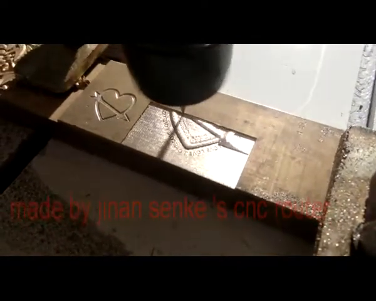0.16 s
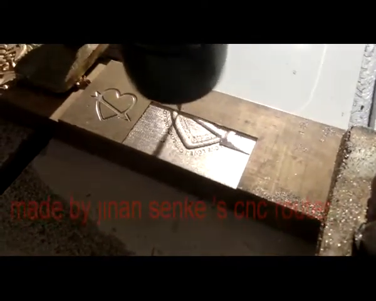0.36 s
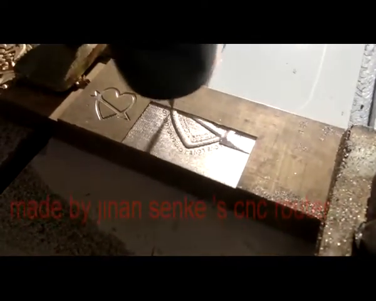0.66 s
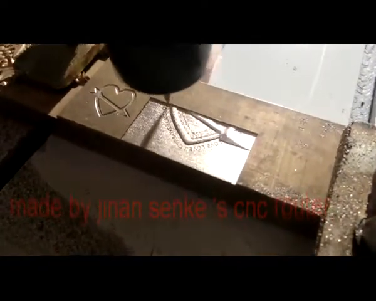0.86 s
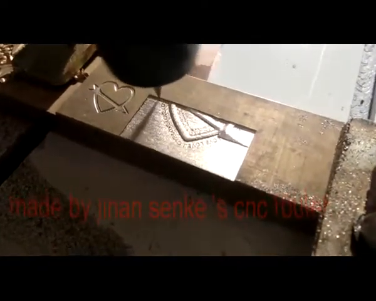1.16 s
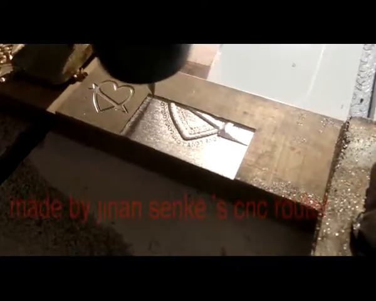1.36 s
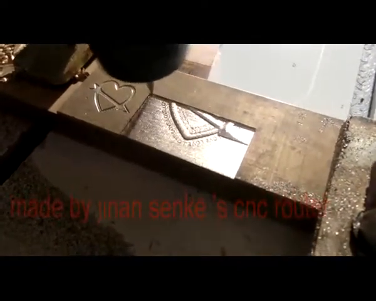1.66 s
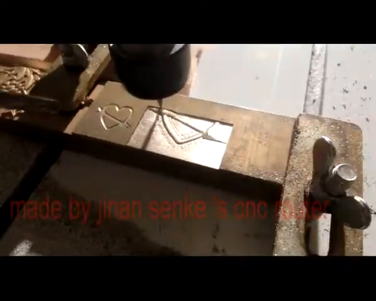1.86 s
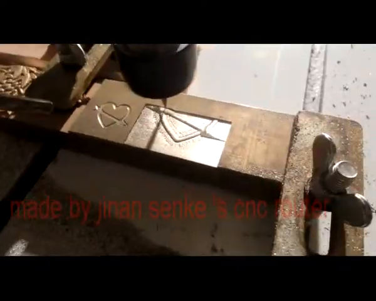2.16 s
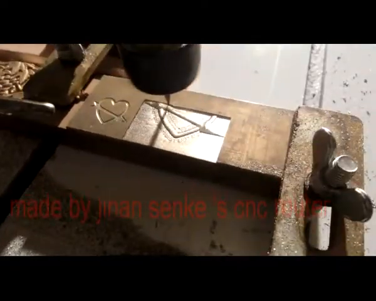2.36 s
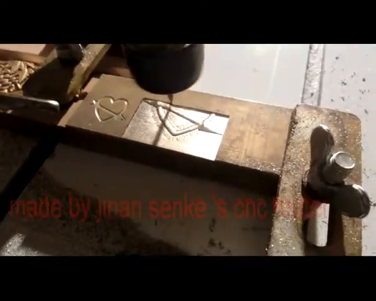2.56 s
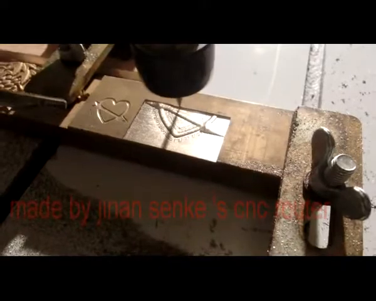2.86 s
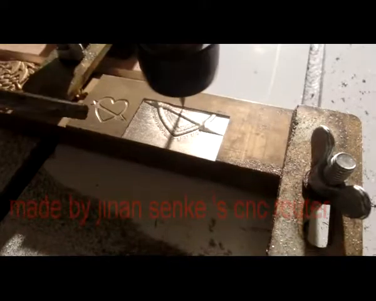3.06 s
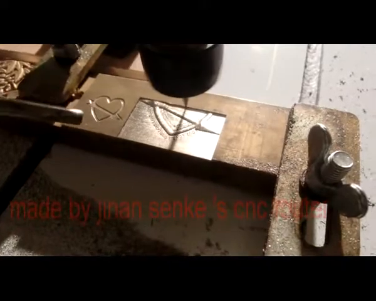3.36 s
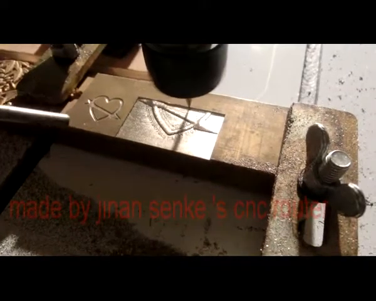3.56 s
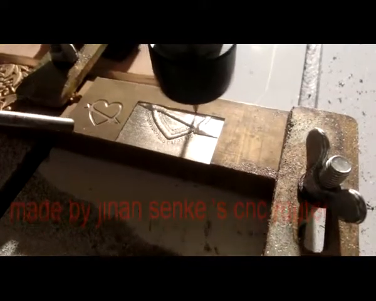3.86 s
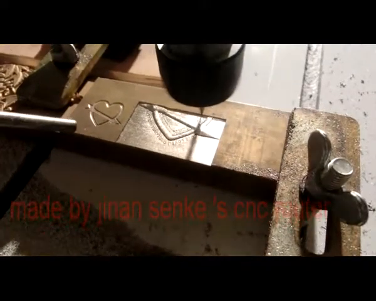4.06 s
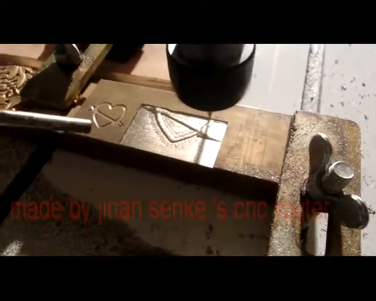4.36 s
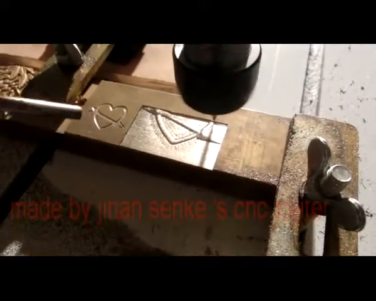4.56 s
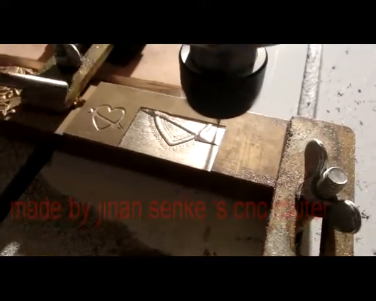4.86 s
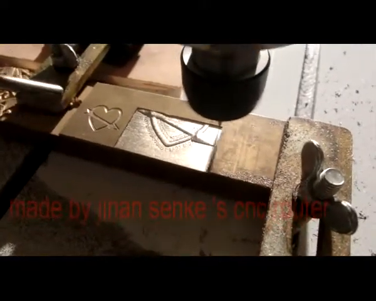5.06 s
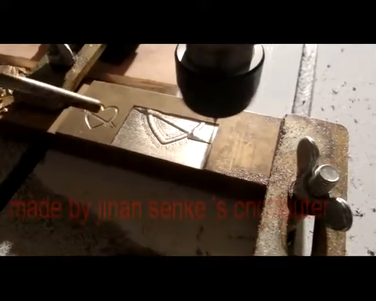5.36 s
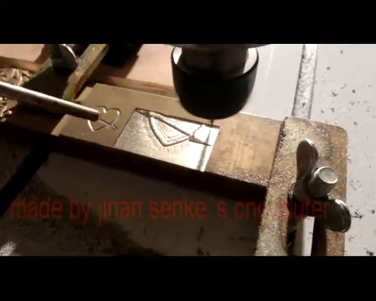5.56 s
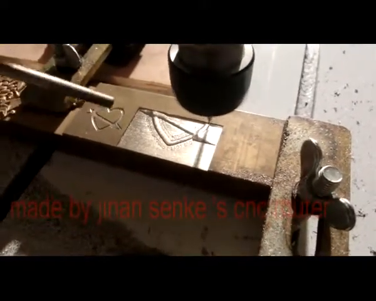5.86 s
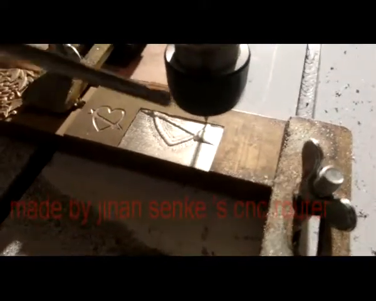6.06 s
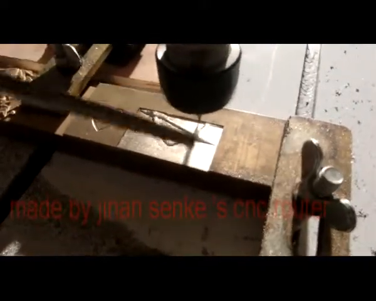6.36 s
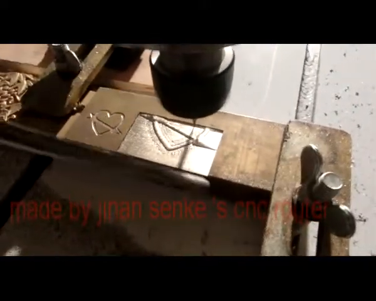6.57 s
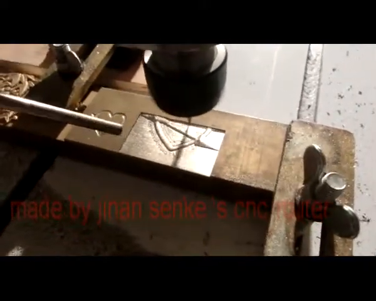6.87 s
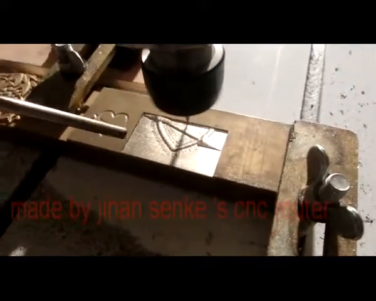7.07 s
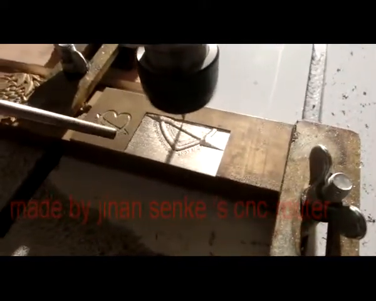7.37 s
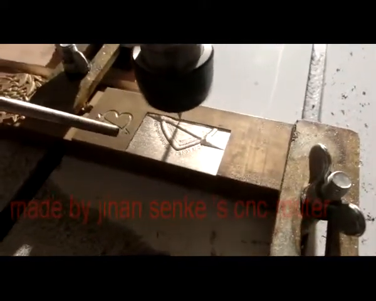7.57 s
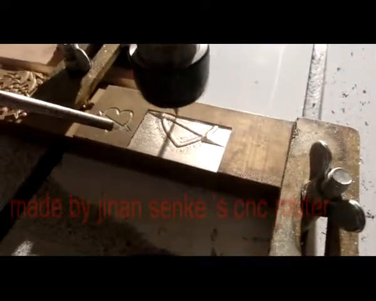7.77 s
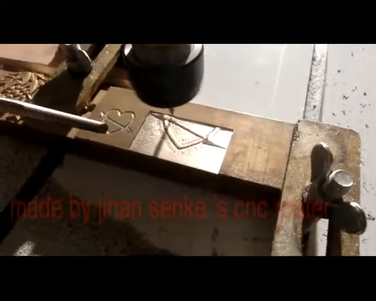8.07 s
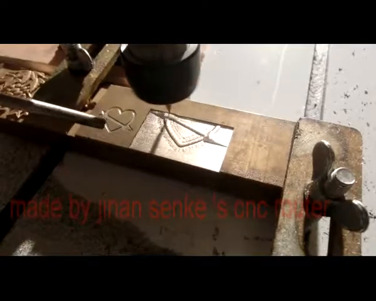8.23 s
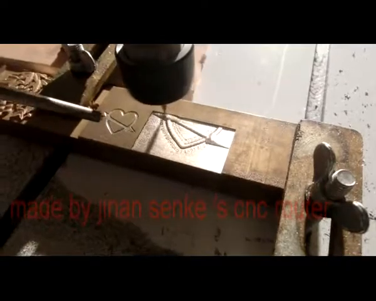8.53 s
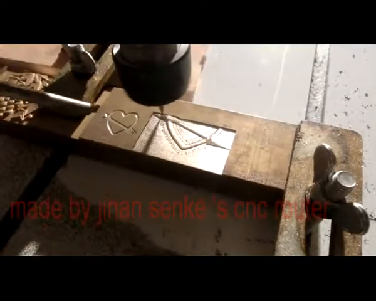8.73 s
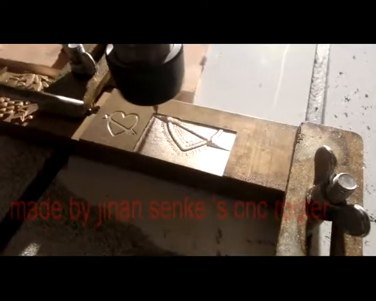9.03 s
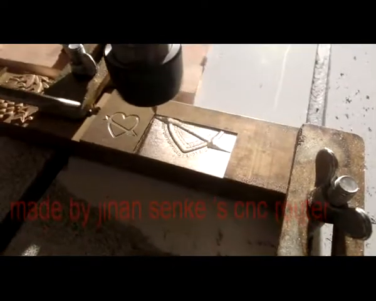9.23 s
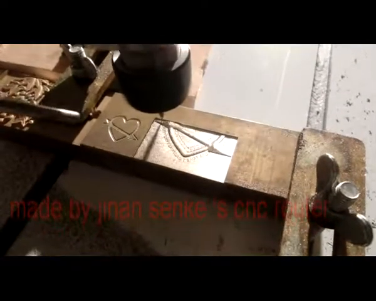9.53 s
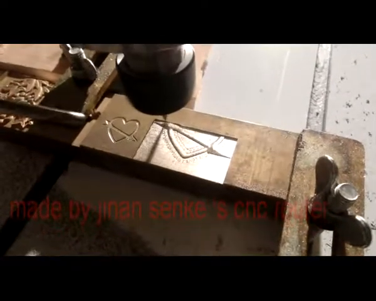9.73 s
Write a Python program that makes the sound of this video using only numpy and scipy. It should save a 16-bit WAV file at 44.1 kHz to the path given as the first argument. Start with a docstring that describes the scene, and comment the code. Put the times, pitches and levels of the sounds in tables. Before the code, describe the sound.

A small router spindle whines at a steady pitch as its bit scrapes and rings against a metal plate. An air gun gives two short, hollow puffs, and all sound cuts out for an instant. It returns with a long hissing blast of air that swells and shifts in tone over the now quieter whine. Feed motors drone faintly underneath, and a single small microphone picks up the machine.

```python
"""A small router spindle whines at a steady speed over a metal plate: harmonics of its shaft rotation and
switching tones of its drive. An air gun blows the chips away with turbulent jet noise: two short puffs, then a
long blast that swings over the plate and the clamps. Beneath them the cutter rushes, scrapes and rings, and the
feed motors drone through the modes of the table. One small microphone hears it all; the sound breaks off once,
just before the long blast, and after the break the microphone hears the scene from a new place, where close
reflections colour the jet."""
import sys
import numpy as np
from scipy import signal
from scipy.io import wavfile
from scipy.ndimage import uniform_filter1d

SR = 44100
rng = np.random.default_rng(int(sys.argv[2]) if len(sys.argv) > 2 else 0)


def dump(signal):
    """Clip the signal to [-1, 1] and save it as 16-bit WAV at the path in sys.argv[1]."""
    limited = np.clip(np.atleast_2d(signal).T, -1, 1)
    pcm = np.round(limited * 32767).astype(np.int16)
    wavfile.write(sys.argv[1], SR, pcm)


N = 436590

SHAFT_HZ, BAND_LIMIT_HZ = 250.27, 7680
# the brief silence: start t/s, end t/s
SILENCE = (1.733, 1.9245)


def spindle():
    """Periodic rotation radiates harmonics (orders) of the shaft rate; drive switching adds high tones."""
    # before and after the silence: t/s, level/dB of orders 1, 2 and 7, drive whine level/dB
    tone_levels = [
        [(0.0, -25, -34.5, -41.5, -38), (0.25, -24, -32.5, -34, -38.5), (0.5, -19.5, -30, -31, -37),
         (0.73, -23.5, -31, -38, -35.5), (0.93, -20, -30.5, -31.5, -36.5), (1.03, -25.5, -34, -36, -41.5),
         (1.6, -22, -30, -33.5, -40), (1.65, -29, -34, -43, -46), (1.731, -30.5, -43, -46, -51)],
        [(1.93, -44.5, -48, -46, -54), (2.15, -38.5, -52, -46, -50), (2.3, -34, -42.5, -51, -48),
         (2.95, -36, -41.5, -52, -48), (3.4, -35, -43, -45, -47), (4.4, -35.5, -39.5, -44, -42),
         (4.72, -34, -40.5, -42.5, -44), (5.2, -34, -39.5, -45.5, -38), (5.6, -28.5, -44, -42.5, -45),
         (6.05, -31.5, -41.5, -43.5, -47), (6.3, -31, -44, -50, -47.5), (6.9, -30, -41.5, -40, -40),
         (8.2, -31, -39.5, -47.5, -43), (8.6, -36, -44.5, -59, -43), (8.95, -30.5, -40, -48.5, -44),
         (9.3, -28.5, -40, -45, -43), (9.55, -33.5, -39.5, -41, -43.5), (9.9, -38.5, -46, -47, -46)],
    ]
    # orders 3 and 4, in the same two parts: t/s, level/dB
    third_order = [
        [(0.0, -43), (0.702, -40), (0.866, -44), (0.896, -38), (1.016, -48), (1.604, -43.5), (1.73, -62)],
        [(1.93, -53.5), (2.19, -59), (2.6, -51), (3.5, -48.5), (4.7, -45.5), (5.95, -45.5), (6.5, -49.5),
         (7.5, -49.5), (8.3, -49.5), (8.81, -58.5), (9.63, -47.5), (9.9, -53)],
    ]
    fourth_order = [
        [(0.0, -50), (0.13, -54), (0.36, -38.5), (0.48, -49), (0.54, -38), (0.722, -53), (0.824, -42.5),
         (1.248, -47.5), (1.566, -44.5), (1.73, -52)],
        [(1.93, -57), (5.92, -55.5), (6.5, -54), (7.68, -63), (9.9, -55.5)],
    ]
    # orders that follow the second: order, level/dB re the second
    upper_orders = [(5, -14.5), (6, -31), (8, -19.5), (9, -28.5), (10, -26), (11, -27), (12, -24.5),
                    (13, -27.5), (14, -26), (15, -25), (16, -27), (17, -28.5), (18, -28), (19, -32.5),
                    (20, -32), (21, -36), (22, -34.5)]
    # one order jumps or dips for a moment: centre t/s, duration/s, order, change/dB
    jumps = [(0.42, 0.16, 7, 2), (0.605, 0.13, 7, -14.5), (0.896, 0.043, 7, -8), (4.48, 0.068, 1, -6),
             (4.492, .08, 2, -4), (4.72, .1, 1, 4), (5.3, 0.063, 2, 10), (5.365, 0.12, 1, 6.5),
             (5.377, 0.11, 2, -3), (5.47, 0.063, 1, -3), (8.188, 0.075, 1, 2.5), (9.34, 0.087, 1, 0.5),
             (9.444, 0.13, 1, -7.5)]
    # switching tones: f/Hz, level/dB re the strongest
    drive_tones = [(5747.8, -20), (5997.8, -21), (6247.8, -21), (6497.8, 0), (6747.6, -14), (6997.6, -7),
                   (7247.5, -16), (7499.0, -16)]
    t = np.arange(N) / SR
    first_db, second_db, seventh_db, whine_db = curves(tone_levels, t)
    turns = SHAFT_HZ * t + 0.01 * wander(25)  # the load nudges the shaft
    levels = {1: first_db + wander(8), 2: second_db + 0.69 * wander(8.7),
              3: curves(third_order, t)[0], 4: curves(fourth_order, t)[0],
              7: seventh_db + 1.7 * wander(11)}
    for centre, length, order, db in jumps:
        near = slice(*np.searchsorted(t, [centre - length / 2, centre + length / 2]))
        levels[round(order)][near] += db * (1 - (2 * (t[near] - centre) / length) ** 4)
    levels.update({order: second_db + db for order, db in upper_orders})
    hum = whine = 0
    for order, db in levels.items():
        waver_db = 1.06 * wander(30) if order < 8 else 2.5 * wander(6)
        hum += gain_of(db + waver_db) * np.cos(2 * np.pi * (order * turns + rng.random()))
    for hz, db in drive_tones:
        whine += gain_of(db + 1.2 * wander(40)) * np.cos(2 * np.pi * (hz * t + rng.random()))
    return np.sqrt(2) * (hum + gain_of(whine_db) * whine)


def air_gun():
    """Jet turbulence radiates four broad noise bands, coloured by fixed and gliding peaks and dips."""
    # fixed peaks and dips from close reflections off plate, clamps and gantry: f/Hz, level/dB
    reflections = [(1119, 2), (1291, -2), (1679, -3.5), (1981, 2), (2325, 1.5), (2454, -5), (2583, 2.5),
                   (2928, 2), (3273, 1.5), (3402, -3), (3660, 1.5), (3832, -2.5), (4048, 2), (4220, -6),
                   (4349, 3), (4608, -2.5), (4980, 3), (5211, -2.5), (5340, 2.5), (5598, -3), (5727, 2.5),
                   (5943, 2), (6158, -2.5), (6287, 2.5), (6632, -1.5), (6880, -2)]
    # passing peaks and dips in the hiss: start t/s, end t/s, start f/Hz, end f/Hz, width/Hz, change/dB
    colour_sweeps = [(0.83, 1.303, 2570, 2800, 300, 7.5), (1.593, 1.74, 2700, 2550, 450, 7),
                     (1.8, 3.1, 5800, 5050, 200, 2.5), (3.1, 4.5, 4900, 5200, 240, 1.5),
                     (1.9, 3.1, 2700, 2700, 690, 1), (3.2, 4.2, 3000, 3200, 64, 0),
                     (2.9, 4.6, 5330, 5330, 70, 5), (3.3, 4.1, 3640, 3640, 110, -2),
                     (1.9, 5.1, 6600, 8700, 410, 4), (6.9, 8.3, 4940, 4940, 50, 3),
                     (6.3, 9.6, 5500, 5500, 52, 1.5), (5.7, 8.3, 3300, 3600, 120, -1.5),
                     (0.98, 4.9, 5100, 7100, 400, 3), (3.12, 4.64, 6000, 6200, 450, 5),
                     (4.6, 6, 2030, 2000, 320, 5), (2.6, 7.4, 4360, 4350, 110, 3.5),
                     (4.4, 6.1, 3290, 3300, 70, 1.5), (3.7, 5.6, 5030, 5700, 70, 3.5),
                     (5.1, 6.2, 4200, 4200, 200, 1), (5.3, 5.96, 6500, 6400, 710, 4.5),
                     (6.05, 6.8, 2300, 2370, 290, 6), (6.15, 6.45, 6900, 6500, 300, 5),
                     (6.4, 7.3, 6000, 6900, 440, 5), (6.0, 6.76, 7600, 7440, 280, 7.5),
                     (7.2, 8.5, 6400, 6360, 480, 5), (6.3, 11, 7700, 8300, 390, 4),
                     (7.1, 11, 4350, 3000, 180, 2), (8.3, 9.7, 2940, 3300, 120, 3),
                     (9.3, 14, 4740, 4740, 110, 1), (8.3, 9.7, 4600, 5600, 130, 2),
                     (8.3, 8.7, 3100, 3600, 1200, 1), (8.9, 11, 7400, 7500, 300, 5.5),
                     (7.7, 12, 1980, 2000, 400, 3)]
    # the dip that makes the puffs hollow: f/Hz, width/Hz, level/dB
    hollow = (4800, 850, -5)

    def spectrum(hz, t):
        """Band powers add, relative to the main band; peaks and dips then filter the sum."""
        _, wash_db, roar_db, hiss_db, hiss_hz = jet_flow(t)
        bands = hump(hz, 3605, 0.27) + gain_of(2 * wash_db) * hump(hz, 1160, 0.65)
        bands += gain_of(2 * roar_db) * hump(hz, 2180, 0.4)
        bands += gain_of(2 * hiss_db) * hump(hz, hiss_hz, 0.37)
        comb_db = sum(db * bell(hz, centre_hz, width_hz=90) for centre_hz, db in reflections)
        hollow_db = hollow[2] * bell(hz, *hollow[:2])
        colour_db = np.where(t < SILENCE[0], hollow_db, comb_db)
        for start, end, start_hz, end_hz, width_hz, db in colour_sweeps:
            progress = np.clip((t - start) / (end - start), 0, 1)
            swell = np.clip(3 * np.sin(np.pi * progress), 0, 1)
            colour_db += db * swell * bell(hz, start_hz + (end_hz - start_hz) * progress, width_hz)
        return gain_of(2 * colour_db) * bands
    turbulence = noise(spectrum, patchy_db=.5, echo_db=-5, streak_s=.3)
    control_t = np.arange(0, N / SR, .001)
    envelope = np.interp(np.arange(N) / SR, control_t, jet_flow(control_t)[0])
    flutter = gain_of(0.071 * wander(60))
    return turbulence * envelope * flutter


def jet_flow(t):
    """The valve sets the jet's amplitude; what the jet strikes sets the balance of its bands."""
    # t/s, main band level/dB, then re that: wash, plate roar, nozzle hiss level/dB; hiss f/Hz
    long_blast = [(1.93, -31, -7, -4, 1, 5600), (1.98, -27.5, -7.5, -2.5, -2.5, 5400),
                  (2.35, -26.5, -10, -3, 2, 5595), (2.9, -27, -10, -2.5, 1.5, 5570),
                  (3.15, -27, -7, -1.5, 1.5, 5600), (3.4, -26, -10, -2, 0.5, 5600),
                  (3.7, -27, -10.5, -4.5, 4.5, 6000), (3.9, -28.5, -10, -2, 4, 6200),
                  (4.52, -27, -12, -4.5, .5, 6100), (4.8, -26, -11.5, -2, 0, 5770),
                  (5.03, -23, -15, -6, -2, 5640), (5.23, -26.5, -12, -6, 0.5, 6040),
                  (5.81, -31, -11, -7, 2.5, 6200), (6.05, -26.5, -15, -4, 2, 5860),
                  (6.08, -25, -7, -2, 1.5, 5900), (6.14, -27.5, -8.5, -4, 3.5, 5900),
                  (6.21, -27, -10, 4, 2, 6200), (6.34, -27, -6.5, 1, 4.5, 6840),
                  (6.54, -21.5, -11, -6.5, -1, 6000), (6.66, -23.5, -10, -6, 0, 6200),
                  (6.695, -20, -21, -1.5, 1, 6450), (6.72, -29.5, -9, -5, 3, 6490),
                  (6.83, -32.5, -8, -2, 5, 6250), (7.45, -34, -8, -2, 5.5, 5940),
                  (8.19, -31, -9.5, -6.5, 5, 6170), (8.75, -28.5, -13, -4.5, 0, 6350),
                  (9.2, -25, -11.5, -7, -3, 6430), (9.68, -27.5, -9.5, -5, 0.5, 6200),
                  (9.9, -28.5, -10.5, -4, -1, 6150)]
    # opening t/s, fullest t/s, shutting t/s, fullest level/dB, then re that: wash, roar, hiss level/dB
    puffs = [(.892, 1.0, 1.058, -26.5, -5, -1.5, 1), (1.567, 1.65, 1.74, -28, -1.5, -1, 4.5)]
    rise_s, tail_s, puff_hiss_hz = 0.028, .15, 6940
    arch_db_per_s, decay_db_per_s = 50, 297
    blast_db, *timbre = curves([long_blast], t)
    amplitude = gain_of(blast_db) * (t > SILENCE[1])
    for start, fullest, shut, db, *bands_db in reversed(puffs):
        opening = np.clip((t - start) / rise_s, 0, 1)
        puff_db = db - arch_db_per_s * abs(t - fullest) - decay_db_per_s * np.maximum(t - shut, 0)
        amplitude += (t < SILENCE[1]) * gain_of(puff_db) * opening
        timbre = [np.where(t < shut + tail_s, puff, later)
                  for puff, later in zip([*bands_db, puff_hiss_hz], timbre)]
    return amplitude, *timbre


def cutter():
    """Bearings, bit and cooling air rush; where the bit bites, friction scrapes and a resonance rings."""
    # spectral density of the rush: f/Hz, relative level/dB
    rush_spectrum = [(30, -8.5), (100, -6.5), (230, -0.5), (320, -3), (520, -4), (640, -6.5), (850, -3),
                     (950, -7.5), (1060, -10.5), (1190, -7), (1350, -6), (2300, -4), (3200, -14.5),
                     (4300, -17), (5200, -22), (5800, -15.5), (6300, -15.5), (7100, -2.5), (7400, -1.5),
                     (7700, -6.5)]
    # course of the rush: t/s, level/dB re rush_db
    rush_levels = [(0, -8.5), (.19, -8), (.23, -1), (.6, -1.5), (.85, 5), (1.17, -0.5), (1.43, -4.5),
                   (1.55, 0.5), (9.9, -2.5)]
    # spurts of scraping and of ringing: start t/s, end t/s, level/dB
    bites = [(.21, .63, -43.5), (.69, .9, -46), (1.15, 1.3, -54), (1.48, 1.6, -52.5)]
    rings = [(.22, .32, -43), (.35, .42, -47), (.48, .585, -39.5), (.69, .84, -53), (1.15, 1.23, -53.5),
             (1.47, 1.53, -54)]
    rush_db, ramp_s = -36.5, 0.018
    gap_db, gaps_from_hz, gaps_to_hz = -8.5, 2800, 6700
    knots_hz, density_db = np.transpose(rush_spectrum)

    def spectrum(hz, t):
        """Rush, scrape and ring are incoherent, so their powers add."""
        # the treble of rush and scrape bunches around the shaft orders, with gaps between
        between = np.sin(np.pi * (hz / SHAFT_HZ - .1)) ** 2 / (1 + (gaps_from_hz / (hz + 1)) ** 8)
        gaps = gain_of(2 * gap_db * (between - .5 * (hz > gaps_from_hz)) * (hz < gaps_to_hz))
        density = gain_of(2 * np.interp(np.log(hz + 1), np.log(knots_hz), density_db))
        density *= gaps * (hz < BAND_LIMIT_HZ)
        rush = gain_of(2 * (rush_db + curves([rush_levels], t)[0])) * density / density.sum()
        scrape = spurts(bites, t, ramp_s, idle_db=-57) ** 2 * gaps * hump(hz, 1750, 0.64)
        ring = spurts(rings, t, ramp_s, idle_db=-62) ** 2 * hump(hz, 2450, 0.054)
        return rush + scrape + ring
    return noise(spectrum, patchy_db=2.0, echo_db=-2.0, streak_s=.4)


def feed_motors():
    """Forced vibration: uneven motor steps excite modes of the table, and the floor rumbles."""
    # modes shaken by the fast axis: f/Hz, width/Hz, relative level/dB
    table_modes = [(139.8, 16, -12), (172, 18, -3.5), (191.7, 33, -0.5)]
    # the mode on which the slow axis hums: f/Hz, width/Hz
    slow_mode = (112, 5)
    # the fast axis travels: start t/s, end t/s, start level/dB, end level/dB
    fast_passes = [(.1, .63, -32.5, -28.5), (.67, 1.16, -28.5, -36), (1.54, 1.68, -35, -39),
                   (2.0, 2.58, -46, -39), (3.12, 3.65, -41, -47.5), (4.2, 5.06, -42.5, -39.5),
                   (5.2, 5.32, -45, -48), (5.57, 6.6, -42, -40.5), (7.02, 7.55, -39.5, -48),
                   (8.04, 8.22, -40, -37), (8.25, 8.92, -46.5, -37.5), (9.3, 9.95, -56.5, -39)]
    # the slow axis travels; the floor rumbles louder: start t/s, end t/s, level/dB
    slow_passes = [(-.1, .1, -39), (.6, .95, -44), (1.18, 1.64, -42.5), (3.52, 3.7, -55), (4.62, 4.85, -59),
                   (6.28, 6.65, -54), (8.0, 8.1, -48), (9.42, 9.65, -46), (9.82, 10, -46)]
    thumps = [(.6, .7, -40), (1.27, 1.33, -41), (1.55, 1.64, -41), (6.42, 6.56, -47)]
    ramp_s = 0.11
    t = np.arange(N) / SR
    chatter = unit_rms(sum(gain_of(db) * resonance(hz, width) for hz, width, db in table_modes))
    hum = resonance(*slow_mode)
    rumble = resonance(hz=60, width_hz=90)
    return (spurts(fast_passes, t, ramp_s, idle_db=-54.5) * chatter
            + spurts(slow_passes, t, ramp_s, idle_db=-58) * hum
            + spurts(thumps, t, ramp_s, idle_db=-57) * rumble)


def resonance(hz, width_hz):
    """A resonator's response to white noise, at rms 1; two passes keep its skirts steep."""
    b, a = signal.iirpeak(hz, hz / width_hz, SR)
    return unit_rms(signal.lfilter(b, a, signal.lfilter(b, a, rng.standard_normal(N))))


def noise(spectrum, patchy_db, echo_db, streak_s, size=2048):
    """Noise of power spectrum(hz, t) per bin, in drifting patches; shifting echoes interfere in streaks."""
    hop = size // 4
    frames, held = N // hop + 5, round(streak_s * SR / hop)
    hz = np.fft.rfftfreq(size, 1 / SR)[:, None]
    real, imag, patches, *echo_parts = rng.standard_normal((frames, len(hz), 5)).T
    patches = unit_rms(uniform_filter1d(uniform_filter1d(patches, 18, axis=0), 7, axis=1))
    echo_real, echo_imag = (unit_rms(uniform_filter1d(uniform_filter1d(part, held, 1), held, 1))
                            for part in echo_parts)
    streaks = unit_rms(abs(1 + gain_of(echo_db) * (echo_real + 1j * echo_imag)))
    white = real + 1j * imag
    shaped = white * np.sqrt(spectrum(hz, np.arange(frames) * hop / SR))
    shaped *= gain_of(patchy_db * patches) * streaks
    white_rms = signal.istft(white, nperseg=size, noverlap=size - hop)[1].std()
    return signal.istft(shaped, nperseg=size, noverlap=size - hop)[1][:N] / white_rms / np.sqrt(2 / size)


def spurts(rows, t, ramp_s, idle_db):
    """Amplitude of soft-edged spurts whose powers add to an idle level."""
    grid = np.linspace(0, t[-1], 4000)
    power = gain_of(2 * idle_db)
    for start, end, *db in rows:
        fade = np.clip(np.minimum(grid - start, end - grid) / ramp_s + .5, 0, 1)
        power = power + gain_of(2 * np.interp(grid, [start, end], [db[0], db[-1]])) * fade ** 2
    return np.interp(t, grid, np.sqrt(power))


def hump(hz, centre_hz, octaves):
    """A band of total power 1, Gaussian over log frequency up to the band limit."""
    power = np.exp(-.5 * (np.log2((hz + 1) / centre_hz) / octaves) ** 2) * (hz < BAND_LIMIT_HZ)
    return power / power.sum(0)


def bell(hz, centre_hz, width_hz):
    """A Gaussian peak of height 1."""
    return np.exp(-.5 * (1.84 * (hz - centre_hz) / width_hz) ** 2)


def wander(rate_hz):
    """Random fluctuation of rms 1, band-limited to about rate_hz."""
    steps = rng.standard_normal(round(N / SR * rate_hz * 2) + 2)
    smooth = signal.resample(steps, 8 * len(steps))
    return unit_rms(np.interp(np.linspace(0, 1, N), np.linspace(0, 1, len(smooth)), smooth))


def curves(tables, t):
    """Linear interpolation at times t of each column of the joined tables."""
    times, *columns = np.concatenate(tables).T
    return [np.interp(t, times, column) for column in columns]


def gain_of(db):
    """Decibels to amplitude ratio; gain_of(2 * db) is the power ratio."""
    return 10 ** (np.asarray(db) / 20)


def unit_rms(x):
    """Normalisation to rms 1."""
    return x / np.sqrt(np.mean(x ** 2) + 1e-20)


def scene():
    """Superposition: the pressures add at one microphone, the same in both channels."""
    return np.tile(spindle() + cutter() + feed_motors() + air_gun(), (2, 1))


def record(dry):
    """The sound falls silent briefly; a low-pass filter limits the bandwidth."""
    t = np.arange(N) / SR
    closing, opening = (SILENCE[0] - t) / 0.0093, (t - SILENCE[1]) / 0.0012
    gate = np.clip(np.maximum(closing, opening) + .5, 1e-4, 1)
    low_pass = signal.firwin(1501, BAND_LIMIT_HZ, window=("kaiser", 9), fs=SR)
    return signal.oaconvolve(dry * gate, low_pass[None], "same")


dry = scene()
out = record(dry)
dump(out)
```